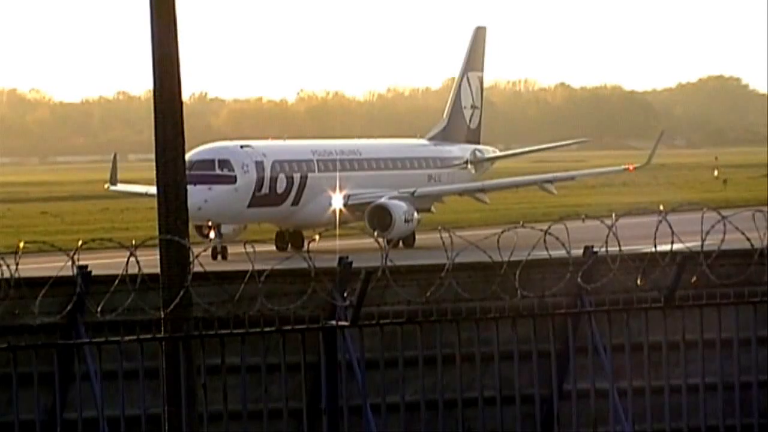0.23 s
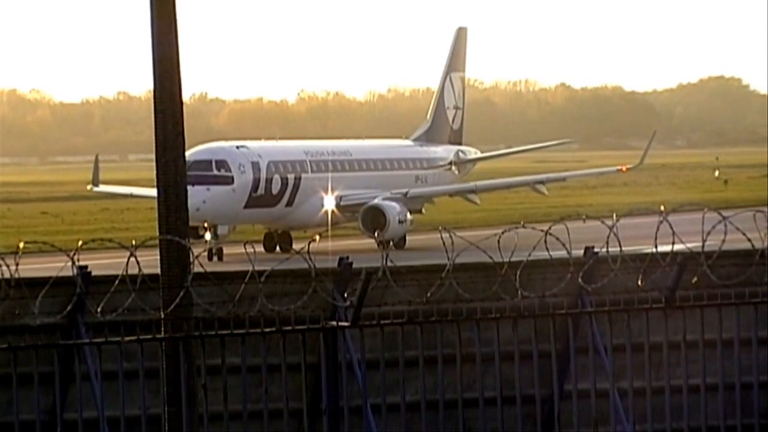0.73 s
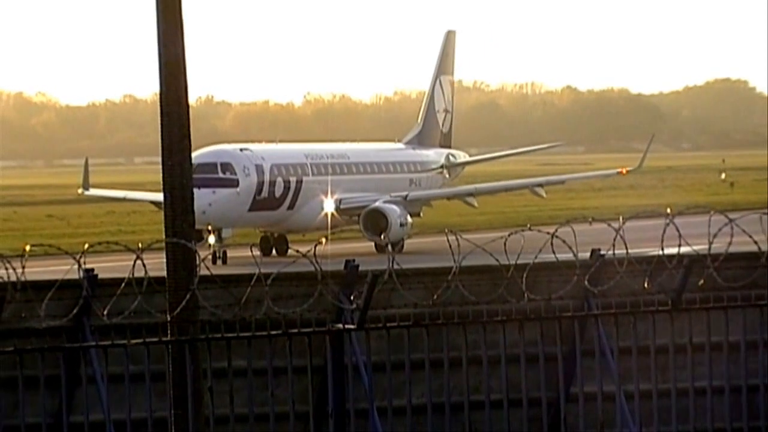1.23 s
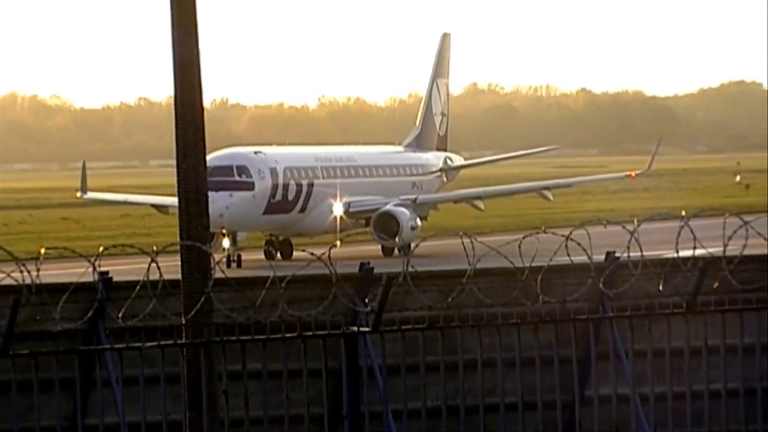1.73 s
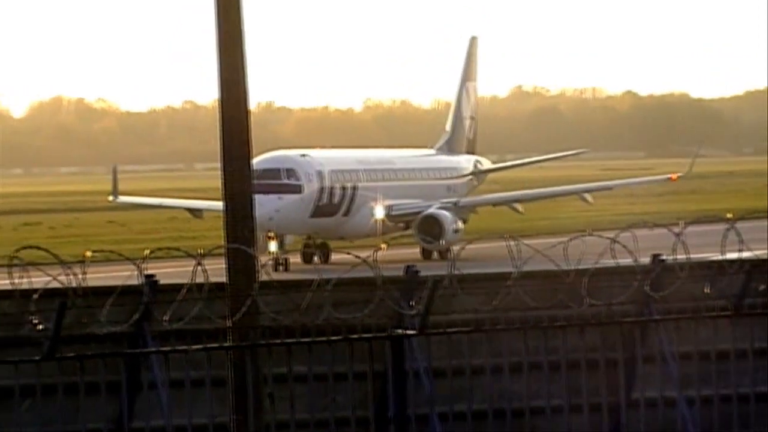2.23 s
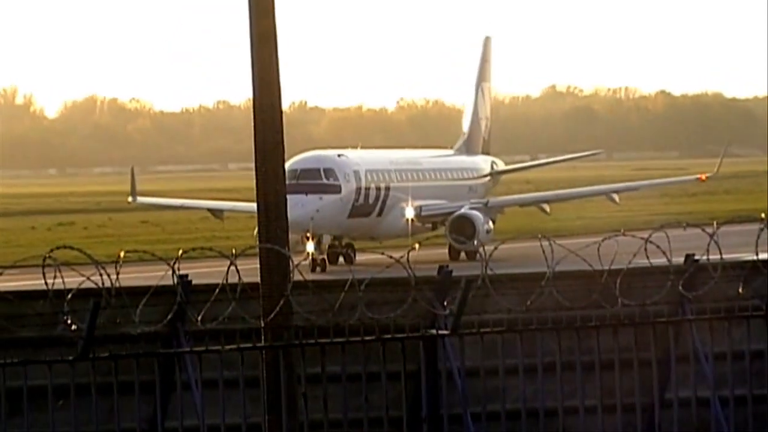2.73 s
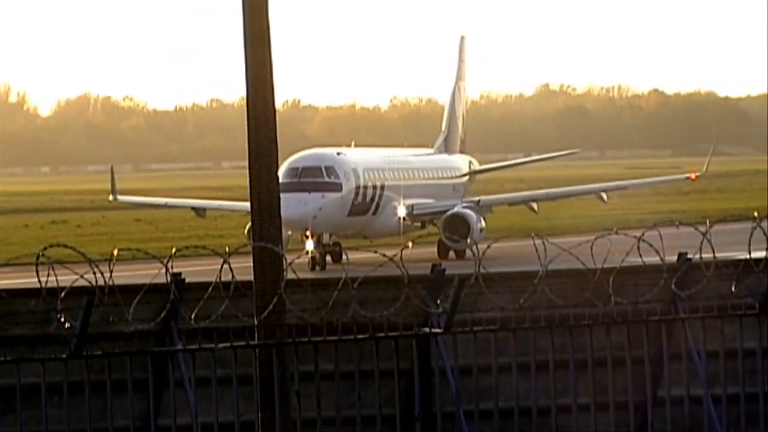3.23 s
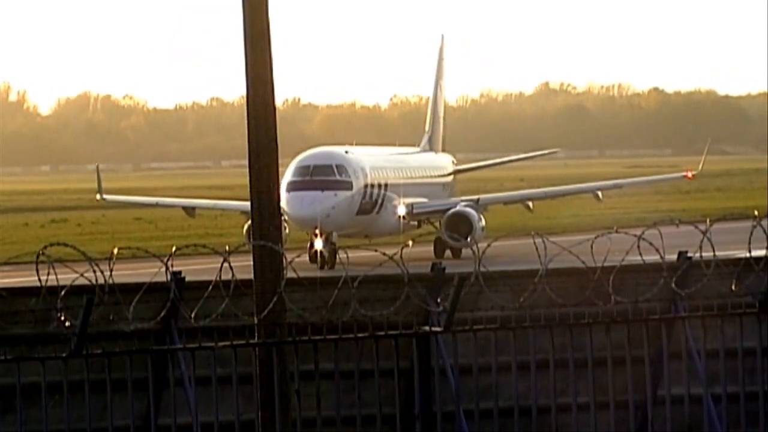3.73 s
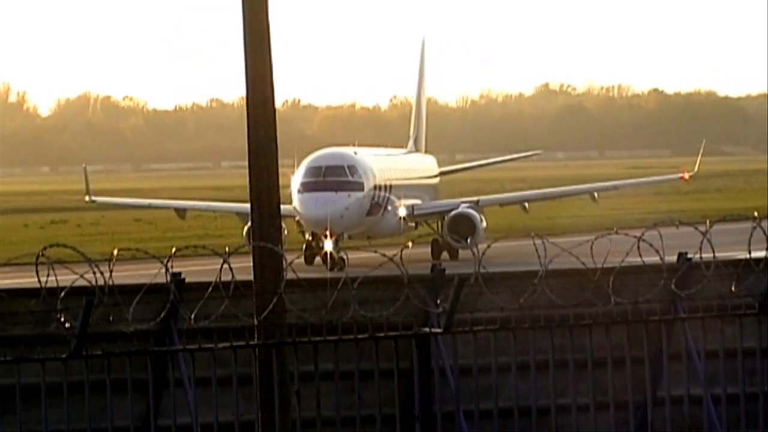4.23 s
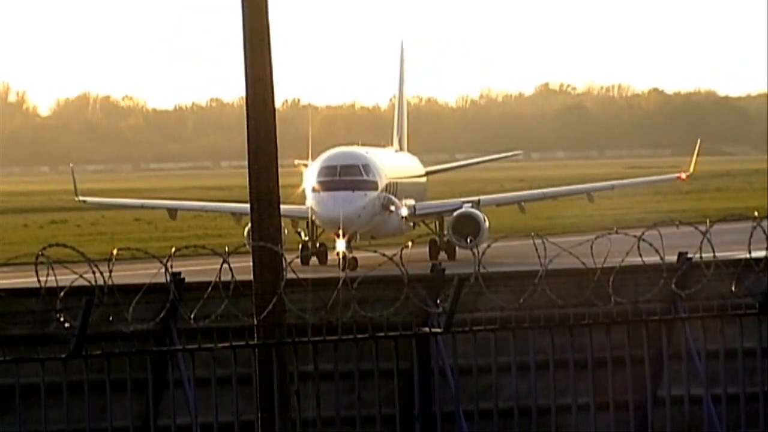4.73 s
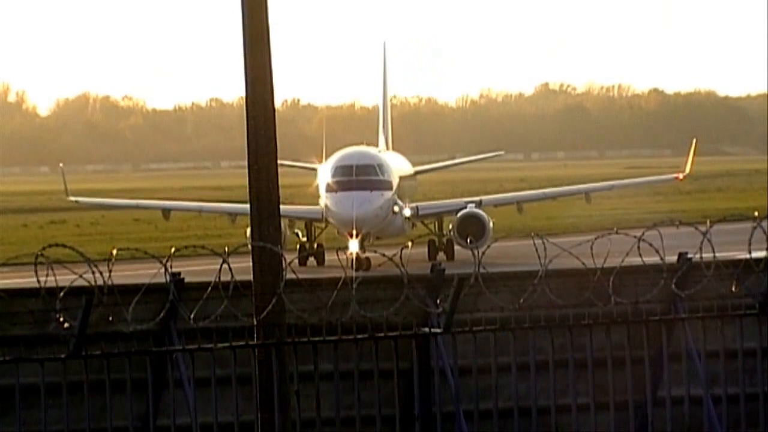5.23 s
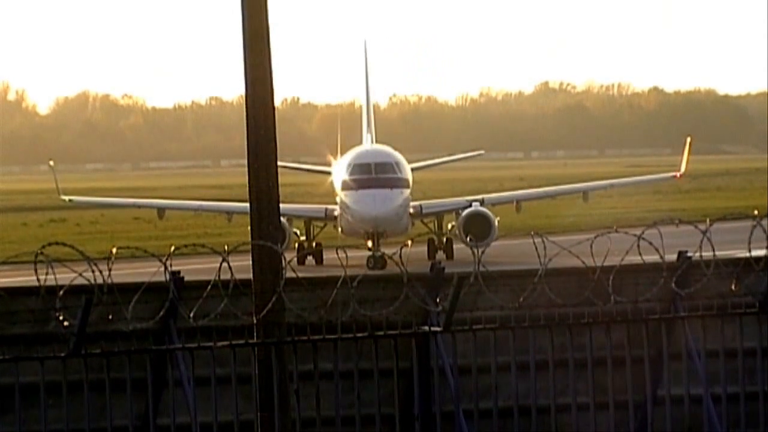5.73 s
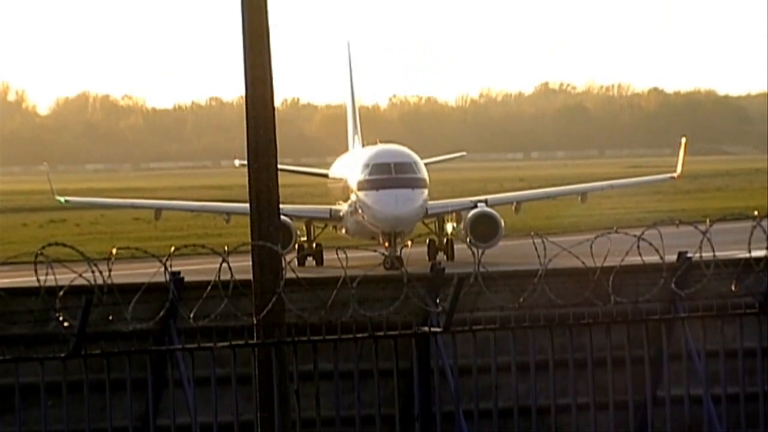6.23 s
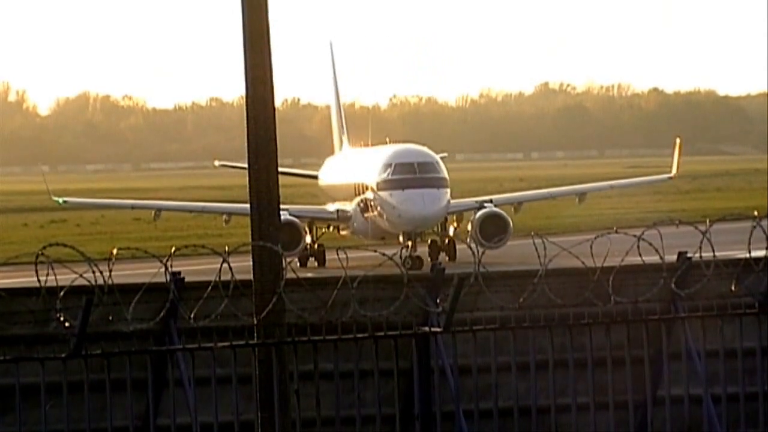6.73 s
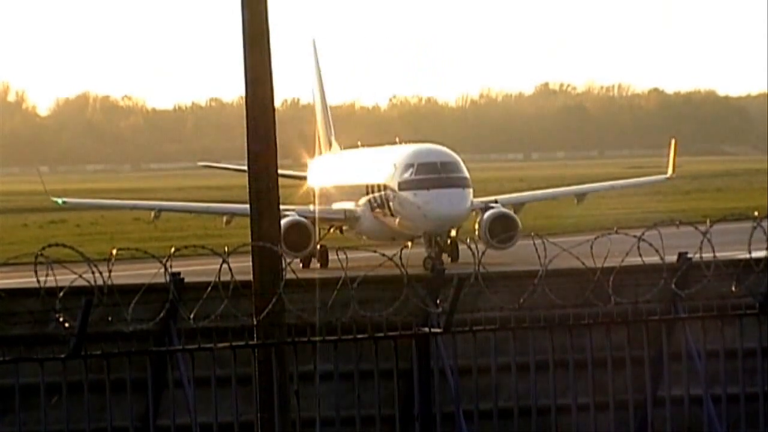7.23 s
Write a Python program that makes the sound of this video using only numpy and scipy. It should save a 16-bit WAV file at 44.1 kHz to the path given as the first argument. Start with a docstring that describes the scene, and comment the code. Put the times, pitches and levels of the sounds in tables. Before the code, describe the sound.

A twin-engined passenger jet taxis toward the listener in the open, its engines idling continuously for about 7.5 seconds. A dense mid-range rush and softer high hiss fill the sound, with very faint low rumble. Over them sit a wavering fan hum, two close pitches beating quickly, a rough, trembling spool whine and thin high whistles. From 0 to 4 s, gusts lift and dip everything by small, irregular amounts. Around 2.4 s the piercing whistle and hiss swell, then ease back by 3.5 s. From about 3.4 s the hum is generally fuller, dipping briefly near 6.7 s. Between 5 and 7.5 s the nose swings through, the hiss darkens, hollow phasing moves through the rush and a whining overtone swells near 7 s. The stereo image leans slightly right, with faint electronic fizz on top. It ends still running.

```python
"""Taxiing twin-engined jet

A twin-engined jet taxis towards the listener at idle thrust and turns its nose through the line of sight.
Coloured noise makes the rumble, exhaust roar, intake rush and hiss; dips and humps in it come and go.
Two fan hums, a little apart in pitch, beat together, and sines make the compressors' whistling tones.
Moving air makes every tone flutter; a slipping sample clock adds a fine fizz on top."""
import sys
import numpy as np
from scipy.fft import rfft, irfft
from scipy.io import wavfile

SR = 44100
rng = np.random.default_rng(int(sys.argv[2]) if len(sys.argv) > 2 else 0)


def generate_wav(signal):
    """Clip the signal to [-1, 1] and save it as 16-bit WAV at the path in sys.argv[1]."""
    frames = np.transpose(np.atleast_2d(signal))
    scaled = np.clip(frames, -1, 1) * 32767
    pcm = np.round(scaled).astype(np.int16)
    wavfile.write(sys.argv[1], SR, pcm)


N = 330750
TIME = np.arange(N) / SR   # s
BINS = np.maximum(np.fft.rfftfreq(N, 1 / SR), 1)   # Hz; at least 1, so that its logarithm exists


def from_db(db):
    """Turn decibels into gain."""
    return 10 ** (np.asarray(db) / 20)


def rms_one(x):
    """Scale to an rms of 1, taken over all samples and sides."""
    return x / np.sqrt(np.mean(x ** 2) + 1e-20)


def in_time(rows):
    """Draw straight lines between a table's rows, giving each column a value at every sample."""
    s, *columns = np.transpose(rows)
    return [np.interp(TIME, s, column) for column in columns]


def over_hz(points):
    """Read a table at every frequency, with straight lines on a logarithmic pitch scale."""
    hz, value = np.transpose(points)
    return np.interp(np.log(BINS), np.log(hz), value)


def swell(at_s, half_s):
    """A smooth bump in time, of height 1."""
    return np.exp(-((TIME - at_s) / half_s) ** 2)


def beamed(gain_db, at_s, half_s):
    """Decibels gained while a beam of sound sweeps over the listener."""
    return gain_db * swell(at_s, half_s)


def drift(rate_hz, size=8192):
    """Slow random motion of spread 1: noise whose parts faster than the rate are weakened."""
    hz = np.fft.rfftfreq(size, TIME[-1] / size)
    spectrum = rfft(rng.standard_normal(size)) / (1 + (hz / rate_hz) ** 2)
    slow = rms_one(irfft(spectrum))
    return np.interp(TIME, np.linspace(0, TIME[-1], size), slow)


# how alike the two microphone ports hear the noise: (f/Hz, likeness from 0 to 1)
PORT_LIKENESS = [(60, 0.89), (160, .89), (280, 0.95), (600, 0.99), (1050, 0.96), (1400, 0.96), (2300, .96),
                 (3150, 0.87), (3900, 0.94), (4800, 1), (6800, 0.94), (8400, 0.87), (11000, 0.82)]


def noise(gain):
    """Stereo noise of a given colour: a shared part, plus a part with opposite sign on the two sides; rms 1."""
    mid, side = rng.standard_normal((2, 2 * len(BINS))).view(complex)
    alike = np.clip(over_hz(PORT_LIKENESS), 0, .998)
    shared = np.sqrt(1 + alike) * mid
    opposite = np.sqrt(1 - alike) * side * [[1], [-1]]
    return rms_one(irfft(gain * (shared + opposite), N))


def tone(hz, scatter, flutter_hz):
    """A direct sine plus a randomly fading part scattered by moving air, which also sways the sides; rms 1."""
    cycles = np.cumsum(hz) / SR + rng.random()
    phase = np.float32(2 * np.pi * (cycles % 1))
    in_step = scatter * drift(flutter_hz)
    across = scatter * drift(flutter_hz)   # a quarter turn away from the direct sine
    sway = .06 * drift(12.0) * [[1], [-1]]
    return rms_one((1 + in_step + sway) * np.sin(phase) + across * np.cos(phase))


# gusts in the air carry the engine noise now better, now worse: (t/s, level/dB)
GUST_LEVEL = [(0, 1.5), (.33, -1), (.83, 0.85), (1.29, -1.7), (1.42, 0.8), (1.67, -1.5), (2.0, 1.2),
              (2.25, -1.2), (2.4, 0.3), (2.92, -0.5), (3.48, -0.5), (3.62, 1.3), (3.83, -2), (3.98, 1),
              (4.68, 0), (5.1, 0.24), (6.7, 0.5), (7.5, -0.3)]


def gusts():
    """Change of level, in decibels, as the moving air carries sound better or worse."""
    gust_db, = in_time(GUST_LEVEL)
    return gust_db


# noise colours, whose shape alone matters as each layer is set to rms 1: (f/Hz, level/dB per Hz)
RUMBLE_COLOUR = [(20, -1), (50, -11), (100, 1.5), (140, -2), (250, -17)]
ROAR_COLOUR = [(60, -32), (125, -19), (190, -23), (280, -6), (360, -10.5), (450, -1), (600, 3.5), (705, 0),
               (800, 5.5), (1000, 0.5), (1300, -4), (2500, -42.5)]
RUSH_COLOUR = [(600, -34), (900, -8.5), (1100, -4.5), (1300, -2), (1600, 2), (2100, 1.5), (2420, -2),
               (2700, -4), (3100, -9.5), (4500, -48)]
HISS_COLOUR = [(1800, -31), (2900, -3.5), (3500, 0), (4500, 0), (5500, -2.5), (6500, -8.5), (7600, -15.5),
               (9500, -23.5), (11500, -44), (16000, -46)]
# the intakes beam their hiss to one side: (gained level/dB, strongest at t/s, half duration t/s)
HISS_SIDE_BEAM = (3, 2.55, 1.53)
RUMBLE_DB, ROAR_DB, RUSH_DB, HISS_DB = -57, -28, -21, -27   # levels before gusts, beam, fade and shimmer
ROAR_FOLLOWS, RUSH_FOLLOWS, HISS_FOLLOWS = 1, 0.88, 1   # dB per dB of gust
HISS_FADE_DB_PER_S = 0.33   # the hiss sinks as the nose comes round


def flow():
    """Moving air as coloured noise: all but the rumble ride the gusts, and rush and hiss shimmer together."""
    gust_db = gusts()
    shimmer = drift(13.0)
    roar_db = ROAR_DB + ROAR_FOLLOWS * gust_db + 0.23 * drift(6.1)
    rush_db = RUSH_DB + RUSH_FOLLOWS * gust_db + 0.28 * shimmer
    hiss_db = HISS_DB + beamed(*HISS_SIDE_BEAM) - HISS_FADE_DB_PER_S * TIME
    hiss_db = hiss_db + HISS_FOLLOWS * gust_db + 0.73 * shimmer
    layers = [(RUMBLE_DB, RUMBLE_COLOUR), (roar_db, ROAR_COLOUR),
              (rush_db, RUSH_COLOUR), (hiss_db, HISS_COLOUR)]
    return sum(from_db(level_db) * noise(from_db(over_hz(colour))) for level_db, colour in layers)


# interference dips, where a negative depth is a small boost and the width is narrowed below:
# (centre f/Hz, width f/Hz, depth level/dB, deepest at t/s, half duration t/s)
INTERFERENCE_DIPS = [(1075, 81, 3, .1, 0.84), (1443, 300, 24, 6.7, 1.4), (2520, 67, -2, 3.6, 2.4),
                     (2370, 140, 9, 6.5, 1.04), (954, 120, 5.5, 5.9, 1.9), (1900, 38, 12, 8.2, 2),
                     (1130, 200, 2.5, 3.7, 1), (1910, 200, 4, 3.84, 0.35), (1540, 70, 5, 7.2, .7),
                     (5400, 800, 2.5, 7, 1.5)]


def interfere(x):
    """Direct and reflected sound cancel in some bands for as long as the geometry holds."""
    spectrum = rfft(x)
    for hz, width_hz, depth_db, at_s, half_s in INTERFERENCE_DIPS:
        band_shape = np.exp(-((BINS - hz) / (0.77 * width_hz)) ** 2)
        band = irfft(spectrum * band_shape, N)
        share_lost = 1 - from_db(-depth_db * swell(at_s, half_s))
        x = x - band * share_lost
    return x


# narrow humps of turbulence, where a negative swell is a dip and the width is narrowed below:
# (centre f/Hz, width f/Hz, steady level/dB, swell level/dB, peak of swell at t/s, half duration t/s)
TURBULENCE_HUMPS = [(311, 85, -55.5, 11.5, 7.0, 0.81), (454.5, 47, -41, 4.5, 4.94, 0.47),
                    (626, 24, -41, 13.5, 7.3, 1.9), (925, 39, -44.5, 11.5, 0.23, 1.2),
                    (1040, 35, -51, 14, 6.1, 0.87), (1264, 52, -33.5, -1.5, 4.4, 0.59),
                    (1427, 91, -33, 6, 7.35, 1.1), (1685, 37, -40, 10, 0.54, 0.35),
                    (1730, 72, -53, 9, 6.8, 1.1), (2000, 40, -36.5, 6, 6, 1.3),
                    (2105, 37, -50, 16.5, 5.3, 0.86), (2374, 68, -36.5, 6, 2.7, 0.45),
                    (2630, 40, -51, 14, 6.9, 1.7), (2954, 19, -48.5, 8, 0.26, 0.84),
                    (3430, 80, -45, 5, 6, 2.8), (4430, 170, -50, 13, 0.6, 2.2)]


def humps():
    """Turbulence ringing in narrow bands of noise, each beamed differently as the plane turns."""
    out = 0
    for hz, width_hz, steady_db, swell_db, at_s, half_s in TURBULENCE_HUMPS:
        band = noise(1 / (1 + ((BINS - hz) / (0.88 * width_hz)) ** 2))
        out = out + from_db(steady_db + beamed(swell_db, at_s, half_s)) * band
    return out


# slower fan's hum, swelling and fading on its way over the airfield, before a trim: (t/s, level/dB)
SLOW_FAN_CURVE = [(0.0, -30.5), (0.41, -29), (0.58, -31), (0.75, -28), (1.5, -24), (2.35, -30),
                  (2.5, -32.5), (3.37, -23.5), (4.04, -23.5), (4.38, -27), (4.79, -24), (5.83, -22),
                  (6.04, -24.5), (6.42, -21), (6.75, -33), (6.88, -24.5), (7.5, -20)]
# faster fan's hum, before a trim: (t/s, level/dB)
FAST_FAN_CURVE = [(0.0, -29), (1.74, -35.5), (2.33, -46), (2.75, -34.5), (3.58, -35.5), (4.58, -45),
                  (5.24, -31), (6.08, -31), (7.5, -34)]
SLOW_FAN_HZ, FAST_FAN_HZ = 630.9, 646.7   # blade-passing pitches at steady idle
FAN_WANDER = 0.0008095   # spread of each shaft's speed, as a share of it


def fans():
    """Two tones at the rates of passing fan blades, beating at their difference in pitch."""
    slow_db, = in_time(SLOW_FAN_CURVE)
    fast_db, = in_time(FAST_FAN_CURVE)
    slow_hz = SLOW_FAN_HZ * (1 + FAN_WANDER * drift(0.54))
    slow = from_db(slow_db - 0.3) * tone(slow_hz, scatter=0.12, flutter_hz=6.7)
    fast_hz = FAST_FAN_HZ * (1 + FAN_WANDER * drift(0.57))
    fast = from_db(fast_db + 0.9) * tone(fast_hz, scatter=0.35, flutter_hz=6.7)
    return slow + fast


# beam of both whistles: (gained level/dB, strongest at t/s, half duration t/s)
WHISTLE_SWEEP = (9, 2.42, .5)
# beam of the spool tone's octave, straight ahead of the intakes: same columns
OCTAVE_SWEEP = (3.7, 7, 0.55)
# the whistle's octave (order 0) and the sidebands above it, before beams and gusts: (level/dB), one per order
SIDEBAND_LEVELS = [-52.5, -51, -58, -61]
# narrow beams of those tones sweep past as the plane turns:
# (order, gained level/dB, strongest at t/s, half duration t/s)
SIDEBAND_SWEEPS = [(0, 6.5, 5.5, 1.9), (1, 10, 3.24, 0.3), (1, 4.5, 5.5, .4), (1, 6, 6.95, .4),
                   (2, 11, 2.55, .75), (3, 8, 1.85, .65), (3, 9, 3.05, .4), (3, 13, 4.6, .35)]
SPOOL_HZ, WHISTLE_HZ = 861.7, 2772   # the core's spool tone also spaces the sidebands
SPOOL_WANDER = .00022   # spread of the core's speed, as a share of it
# levels before fade, beams and gusts
SPOOL_DB, OCTAVE_DB, WHISTLE_DB, SECOND_WHISTLE_DB = -31.5, -31, -39.5, -43
SPOOL_FADE_DB_PER_S = 1.37
WHINE_FOLLOWS = 1.3   # dB per dB of gust


def compressors():
    """Rough spool tones and a clean whistle with sidebands; the second engine's whistle is lower and weaker."""
    gust_db = gusts()
    speed = 1 + SPOOL_WANDER * drift(1.77)
    whistle_beam_db = beamed(*WHISTLE_SWEEP)

    spool_db = SPOOL_DB - SPOOL_FADE_DB_PER_S * TIME
    out = from_db(spool_db) * tone(SPOOL_HZ * speed, scatter=2.5, flutter_hz=16.0)
    octave_db = OCTAVE_DB + beamed(*OCTAVE_SWEEP) + 0.42 * drift(6.6)
    out += from_db(octave_db) * tone(2 * SPOOL_HZ * speed, scatter=2.4, flutter_hz=27)

    whistle_hz = WHISTLE_HZ * speed
    out += from_db(WHISTLE_DB + whistle_beam_db) * tone(whistle_hz, scatter=0.27, flutter_hz=7.0)
    second_db = SECOND_WHISTLE_DB + whistle_beam_db
    out += from_db(second_db) * tone(whistle_hz - 15, scatter=1.0, flutter_hz=4.7)

    for order, steady_db in enumerate(SIDEBAND_LEVELS):
        beams = [beam for which, *beam in SIDEBAND_SWEEPS if round(which) == order]
        level_db = steady_db + sum(beamed(*beam) for beam in beams)
        sideband_hz = (2 * WHISTLE_HZ + order * SPOOL_HZ) * speed
        out += from_db(level_db) * tone(sideband_hz, scatter=0.39, flutter_hz=6.0)
    return from_db(WHINE_FOLLOWS * gust_db) * out


# level difference between the ports: (f/Hz, left minus right level/dB)
PORT_LEAN = [(60, -4), (92, -6), (140, -4.5), (210, -3.5), (330, -2.5), (500, -2.5), (770, -2.5),
             (1170, -2.0), (1790, -1), (2740, -2), (4190, -3.5), (6410, -2.5), (9810, -2.5), (15000, -2)]
# delay between the ports: (f/Hz, radians by which left leads)
PORT_LEAD = [(300, .05), (520, .04), (630, -0.19), (1000, -0.027), (2000, 0), (2300, 0.06), (3050, .22),
             (4000, .02)]


def scene():
    """Both engines, with each side given half of the level and phase difference between the ports."""
    engines = interfere(flow()) + humps() + fans() + compressors()
    sides = np.array([[.5], [-.5]])
    gain = from_db(sides * over_hz(PORT_LEAN))
    turn = np.exp(1j * sides * over_hz(PORT_LEAD))
    return irfft(rfft(engines) * gain * turn, N)


CLOCK_HZ, SLIP_HZ, CUTOFF_HZ = 48000, 3900, 15720


def record(dry):
    """The sample clock slips in a sawtooth, mirroring the whine into a centred top fizz; the top is cut steeply."""
    timing_error_s = ((TIME * SLIP_HZ) % 1 - .5) / CLOCK_HZ
    # a small timing error shifts each sample by the error times the slope of the wave
    slope = irfft(2j * np.pi * BINS * rfft(dry.mean(axis=0)), N)
    fizz = from_db(-0.6) * timing_error_s * slope
    top_cut = np.clip((CUTOFF_HZ - BINS) / 100 + .5, 0, 1)   # falls to silence over 100 Hz
    return irfft(rfft(dry + fizz) * top_cut, N)


dry = scene()
out = record(dry)
generate_wav(out)
```